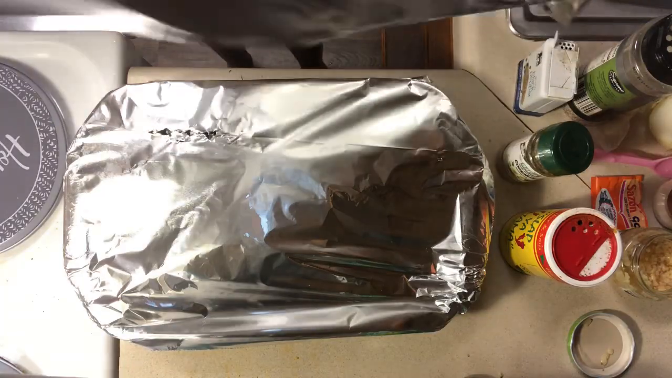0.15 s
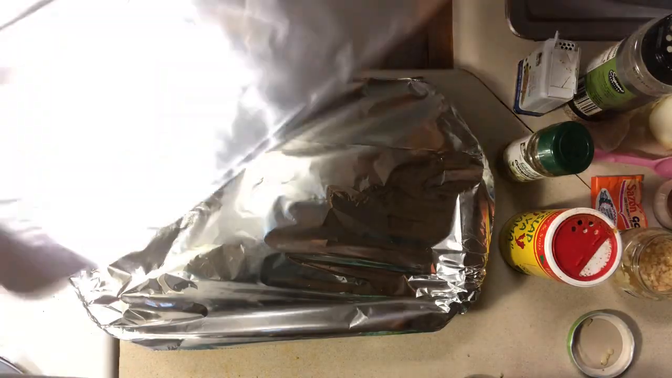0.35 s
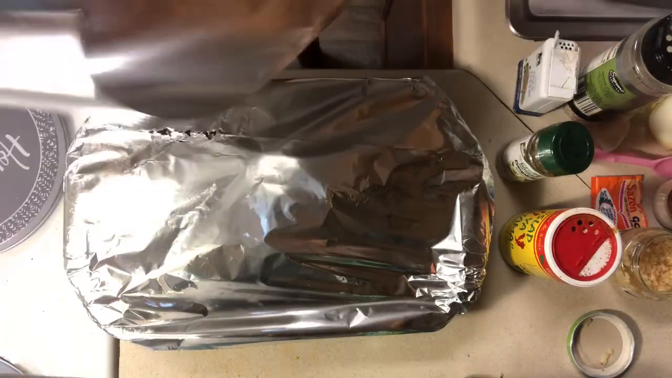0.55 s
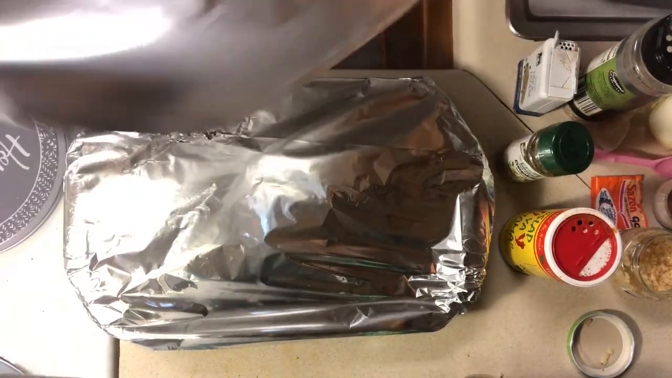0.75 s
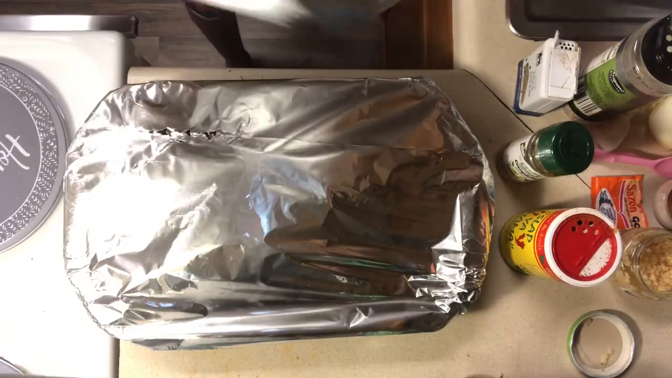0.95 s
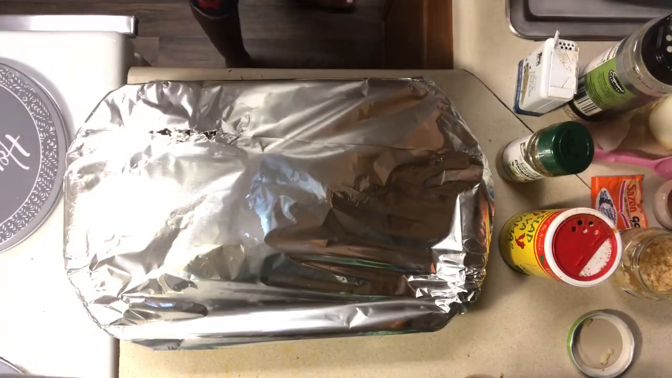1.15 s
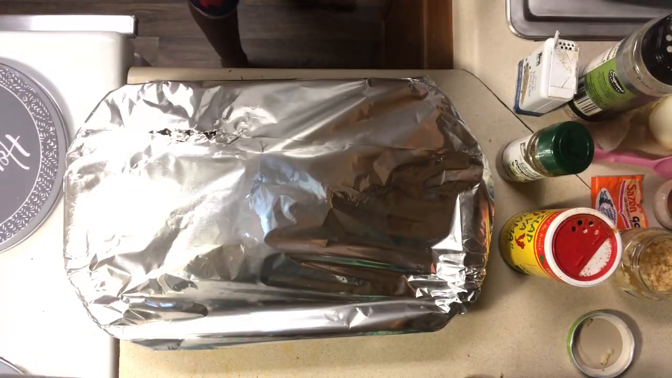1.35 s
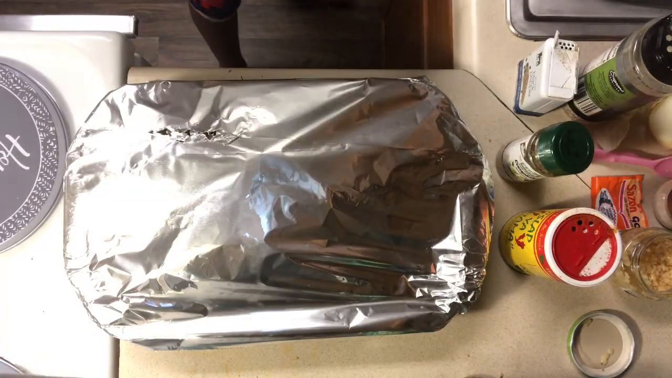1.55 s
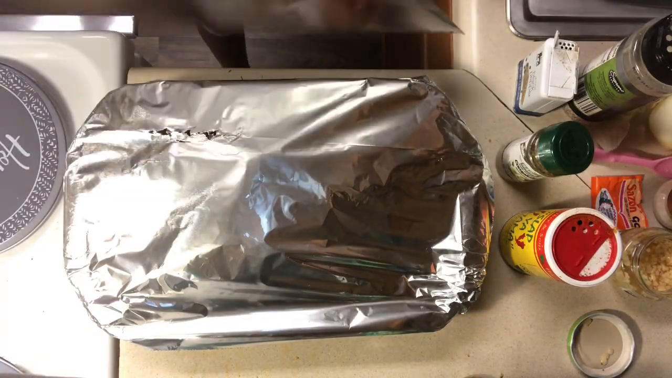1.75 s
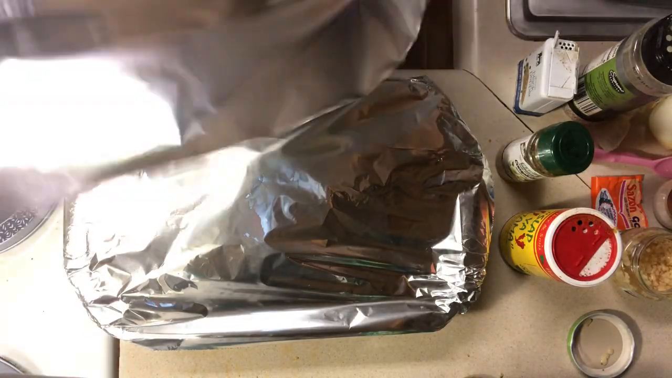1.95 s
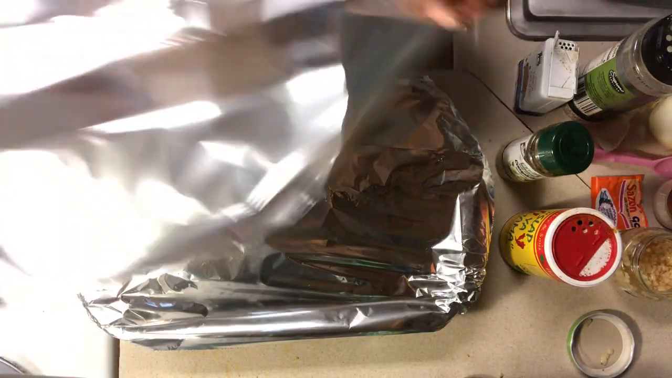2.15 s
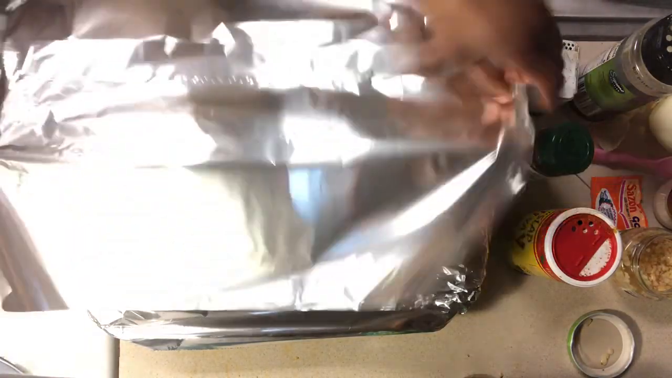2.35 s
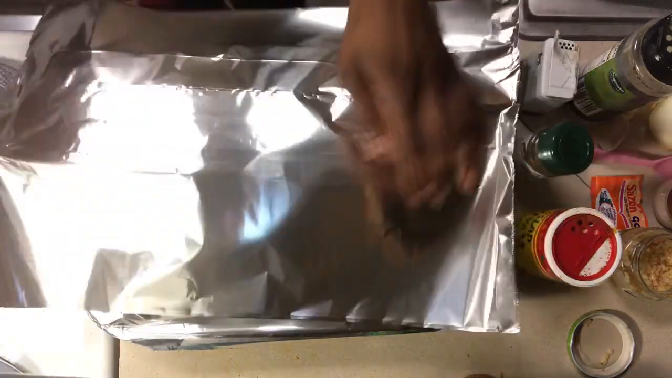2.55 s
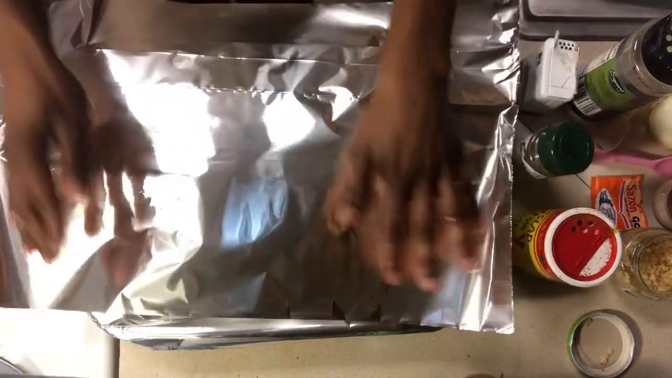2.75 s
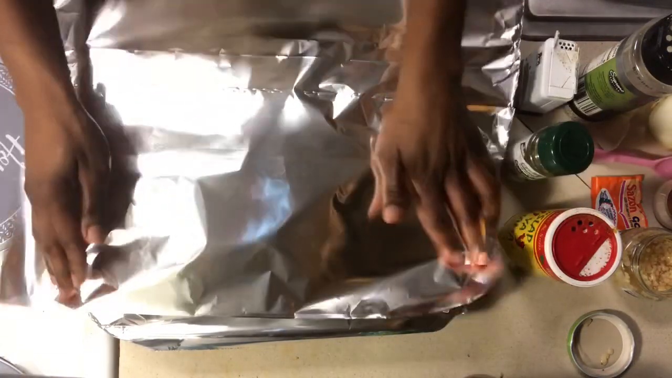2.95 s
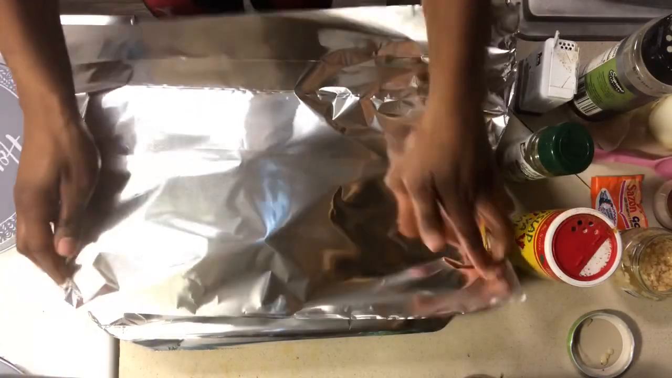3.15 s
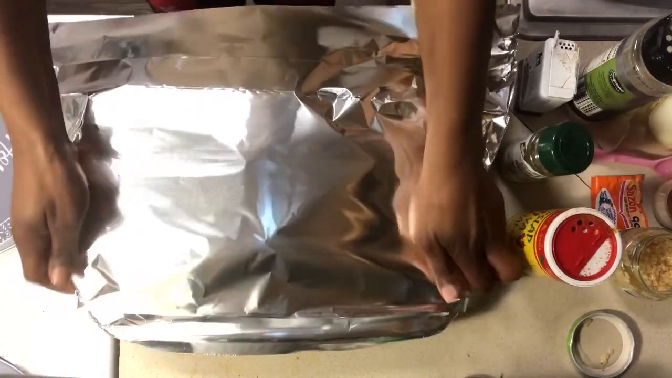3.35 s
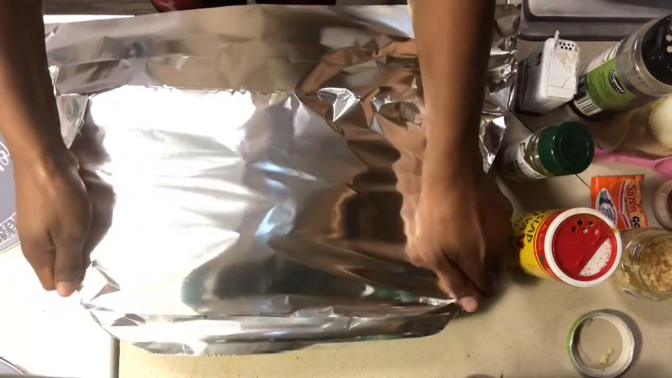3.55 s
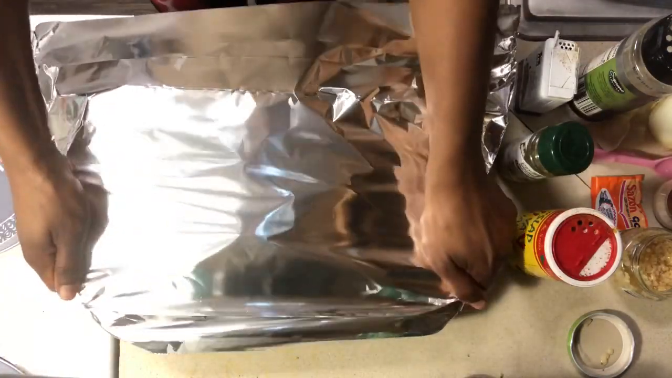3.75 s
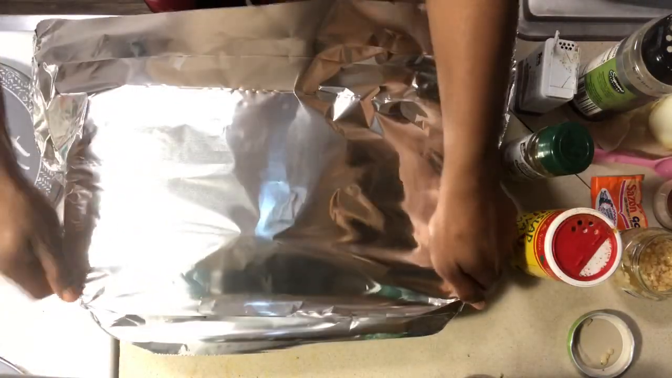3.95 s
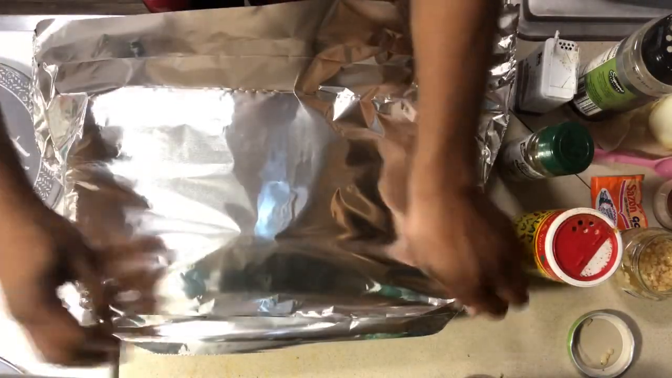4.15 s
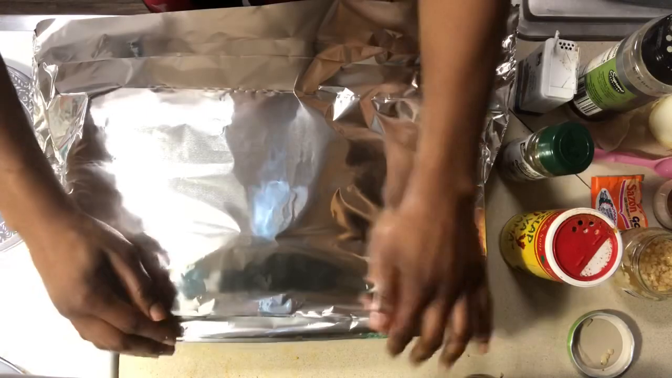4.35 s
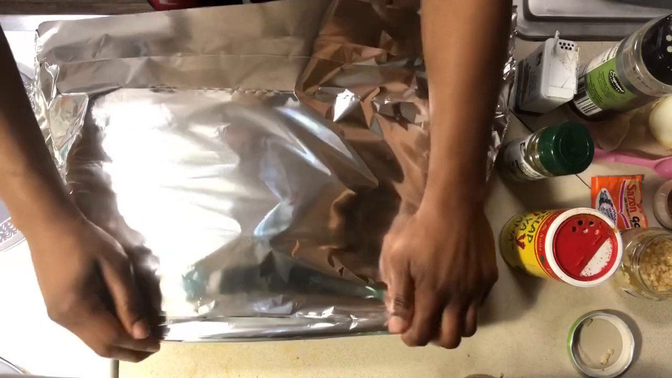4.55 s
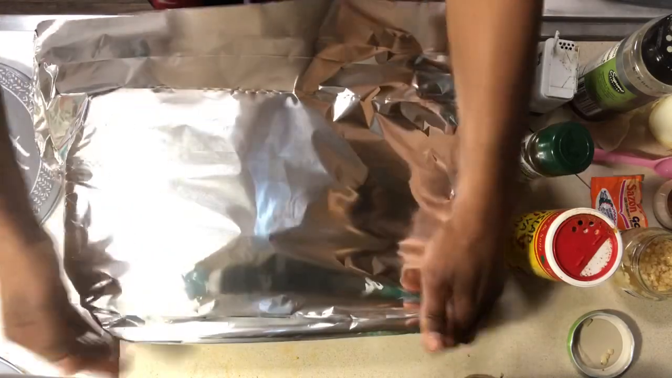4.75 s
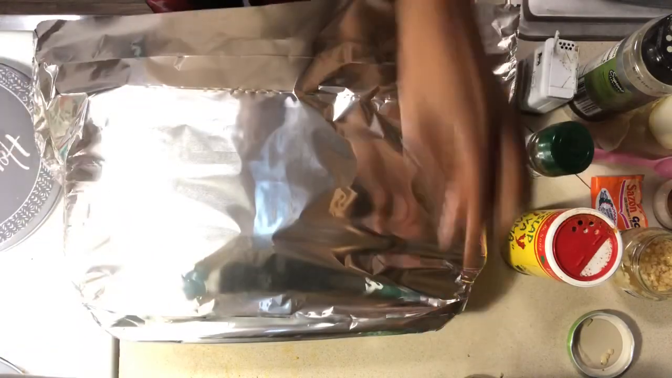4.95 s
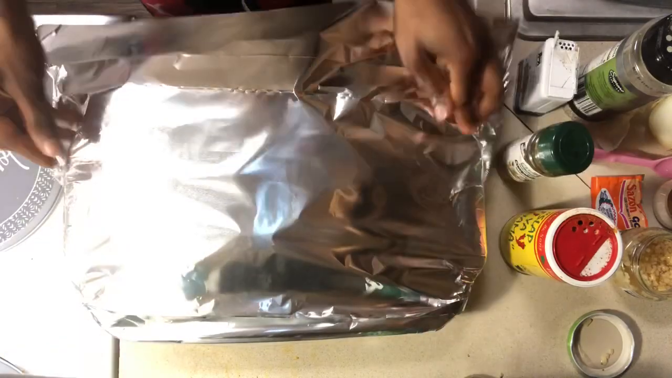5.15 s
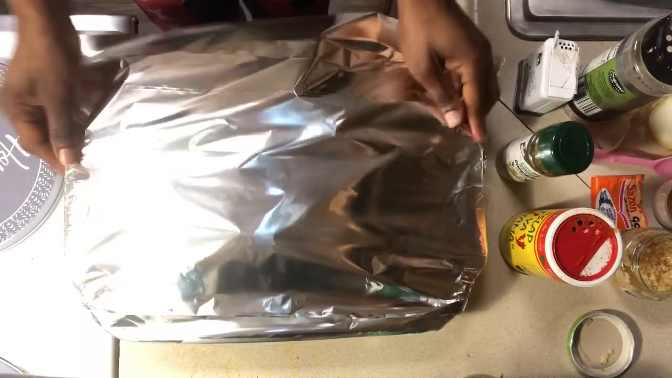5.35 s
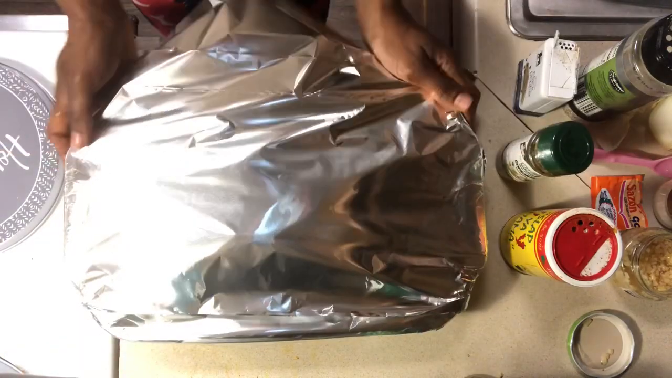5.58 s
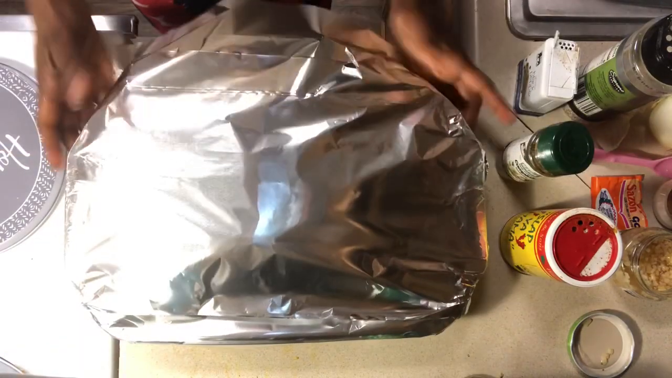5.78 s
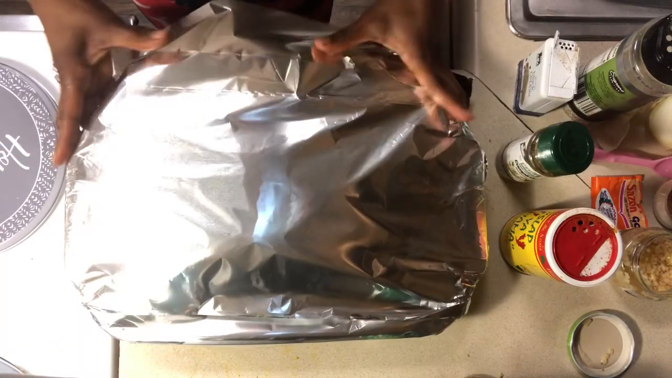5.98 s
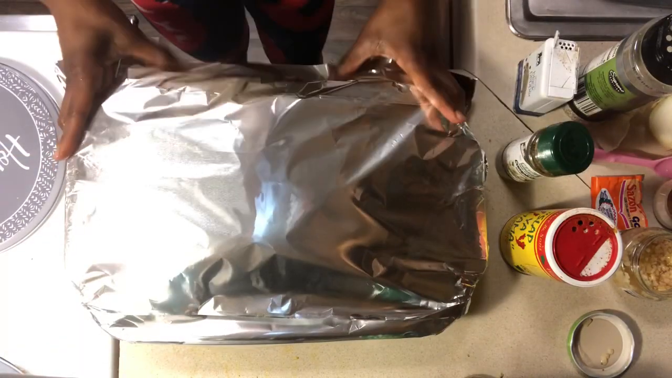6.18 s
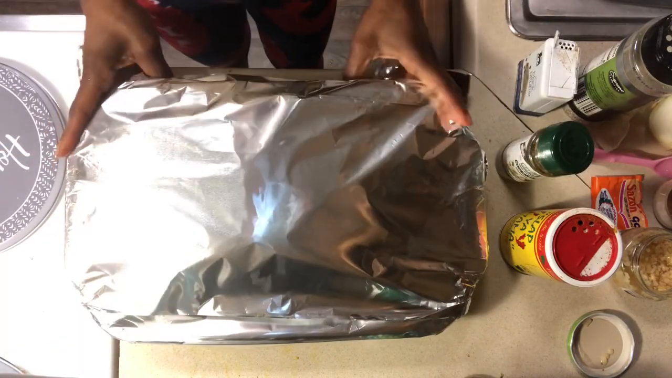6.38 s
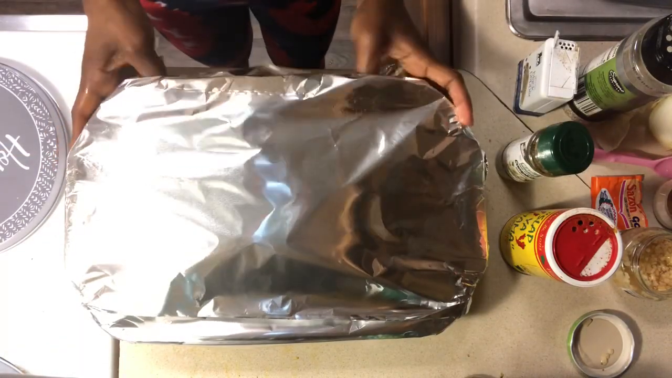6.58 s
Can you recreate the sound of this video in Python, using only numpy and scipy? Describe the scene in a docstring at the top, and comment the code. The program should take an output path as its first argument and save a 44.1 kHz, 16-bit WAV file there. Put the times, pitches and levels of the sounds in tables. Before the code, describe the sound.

Foil is pulled off a roll that rattles in its cardboard box, ripped along a serrated cutter, then crackles as hands crimp it over a dish.

```python
"""Crackling, sizzling foil is pulled off a roll that knocks in its cardboard box, torn along the cutter,
laid on a baking dish and crimped round the rim; dull low thuds sound below and a small kitchen hums.
Every buckling crease is a tiny snap that sets a patch of the sheet ringing, as random impulses through
decaying noise bands. Knocks and thuds are noise bursts through resonances; the kitchen is filtered noise."""
import sys
import numpy as np
from scipy import signal
from scipy.fft import rfft, irfft, next_fast_len
from scipy.io import wavfile
from scipy.ndimage import uniform_filter1d

SR = 44100
rng = np.random.default_rng(int(sys.argv[2]) if len(sys.argv) > 2 else 0)


def generate_wav(sig):
    """Save sig (samples, or channels by samples) to the path in sys.argv[1] as 16-bit PCM at SR."""
    pcm = np.round(np.clip(np.atleast_2d(sig).T, -1, 1) * 32767).astype(np.int16)
    wavfile.write(sys.argv[1], SR, pcm)


N = 291927
TIME = np.arange(N) / SR


def from_db(db):
    """Logarithmic level: decibels to amplitude gain."""
    return 10 ** (np.asarray(db) / 20)


def rms_one(x):
    """Normalisation: scale to an effective value of 1."""
    return x / np.sqrt(np.mean(x ** 2) + 1e-20)


def unit_energy(x):
    """Normalisation: scale to a total energy of 1."""
    return x / np.linalg.norm(x)


def in_time(rows):
    """Linear interpolation: the columns of a curve at every sample."""
    s, *columns = np.transpose(rows)
    return [np.interp(TIME, s, column) for column in columns]


def at_hz(points, hz):
    """Logarithmic pitch scale: read a table along a log-frequency axis."""
    f, value = np.transpose(points)
    return np.interp(np.log(hz + 1e-3), np.log(f), value)


def shaped(x, gain):
    """Linear filtering: multiply the spectrum by a smooth gain, given as a function of frequency."""
    size = next_fast_len(len(x) + 2048)
    spectrum = rfft(x, size) * gain(np.fft.rfftfreq(size, 1 / SR))
    return irfft(spectrum, size)[:len(x)]


def cut(x, hz, kind, order=2):
    """Maximally flat (Butterworth) low- or high-pass."""
    return signal.sosfilt(signal.butter(order, hz, kind, fs=SR, output="sos"), x)


def resonate(x, hz, width_hz):
    """Simple resonance: a pole pair whose damping sets the bandwidth, with gain 1 on top."""
    r = np.exp(-np.pi * width_hz / SR)
    zeros = np.array([1, 0, -1]) * (1 - r * r) / 2
    return signal.lfilter(zeros, [1, -2 * r * np.cos(2 * np.pi * hz / SR), r * r], x)


def add(out, s, sound):
    """Superposition: mix a sound in at a time."""
    start = max(round(s * SR), 0)
    out[start:start + len(sound)] += sound[:max(N - start, 0)]


def dense_ring(t60s, patchy_db, size):
    """High modal density: overlapping modes as noise bands, each with its own decay and level; energy 1."""
    t, hz = np.arange(size) / SR, np.fft.rfftfreq(size, 1 / SR)
    edges = np.geomspace(80, 20000, 33)[:, None]
    low, high = edges[:-1], edges[1:]
    random_phase = np.exp(2j * np.pi * rng.random(len(hz)))
    bands = irfft(random_phase * ((hz >= low) & (hz < high)), size)
    decay_db = -60 * t / at_hz(t60s, np.sqrt(low * high))
    uneven = rms_one(uniform_filter1d(rng.standard_normal(len(bands)), size=3))[:, None]
    return rms_one(np.sum(bands * from_db(decay_db + patchy_db * uneven), axis=0)) / np.sqrt(size)


# Colour of the background air noise. Each row: frequency in Hz, gain in dB.
AIR_COLOUR = [(30, -21), (60, -4.5), (110, -5), (170, 0), (260, -4), (560, -4.5), (680, -11.5), (850, -14),
              (2300, -13.5), (3800, -25), (5500, -32), (9000, -37), (15000, -49.5)]
# Appliance hum and fan resonances, each two equal resonators in series.
# Each row: frequency in Hz, width of one resonator in Hz, rms level in dB.
HUM_BANDS = [(122.5, 3.5, -65), (165.5, 8.6, -58), (245.8, 7.1, -67.5), (341, 22, -66.5),
             (480.5, 79, -61.5), (598, 74, -65)]


def background(air_db=-52.0, lowest_hz=42):
    """Filtered noise: a steady rush of air, and narrow noise bands for the hum of an appliance."""
    air = shaped(rng.standard_normal(N), lambda hz: from_db(at_hz(AIR_COLOUR, hz)))
    out = from_db(air_db) * rms_one(cut(air, lowest_hz, "high"))
    for hz, width_hz, db in HUM_BANDS:
        noise = rng.standard_normal(N + SR)   # the first second lets the resonators settle
        band = resonate(resonate(noise, hz, width_hz), hz, width_hz)[SR:]
        out += from_db(db) * rms_one(band)
    return out


# Reverberation of the kitchen. Each row: frequency in Hz, time to decay by 60 dB in seconds.
ROOM_DECAY = [(100, 0.21), (400, 0.8), (1000, 0.17), (3500, 0.6), (8000, 0.39), (16000, 0.32)]


def kitchen(x, wet_db=-17.0, delay_s=.007):
    """Reverberation: the direct sound, then the short diffuse tail of a hard-walled room."""
    out = x.copy()
    tail = signal.oaconvolve(x, dense_ring(ROOM_DECAY, patchy_db=0, size=20000))[:N]
    add(out, delay_s, from_db(wet_db) * tail)
    return out


# Dull low thuds: one as the roll knocks in its box, the rest as the dish rocks on the counter.
# Each row: start in seconds, relative peak level in dB.
LOW_THUDS = [(1.073, -43), (3.131, -51), (4.769, -50), (5.482, -51), (5.581, -47), (5.957, -53),
             (6.058, -43)]


def low_thuds(level_db=3.5, decay_s=0.027):
    """Forced vibration: a decaying push excites a low resonance, heard as a dull thud."""
    out, t = np.zeros(N), TIME[:SR // 4]
    for s, peak_db in LOW_THUDS:
        push = rng.standard_normal(len(t)) * np.exp(-t / decay_s)
        thud = resonate(push, 85, 34) + resonate(push, 85, 35)
        thud = cut(cut(thud, 240, "low"), 45, "high")
        add(out, s, from_db(peak_db + level_db) * thud / np.abs(thud).max())
    return out


# The spell in which the roll rattles: start in seconds, end in seconds.
RATTLE_SPAN = (0.265, 0.495)


def rattle(per_s=52, clack_db=-14.5, boom_db=-31.5, scatter_db=1.5):
    """Jittered repetition: uneven knocks while the roll spins, as rows like those of ROLL_KNOCKS."""
    times = np.arange(*RATTLE_SPAN, 1 / per_s)
    chance = rng.standard_normal((len(times), 3))
    return [(s + shift * 0.18 / per_s, clack_db + scatter_db * clack, boom_db + scatter_db * boom)
            for s, (shift, clack, boom) in zip(times, chance)]


# Single knocks of the roll in its box, strong and faint.
# Each row: start in seconds, relative peak level of the clack in dB, relative rms level of the boom in dB.
ROLL_KNOCKS = [(0.3226, -2.5, -34), (0.3415, -6.5, -40), (0.351, -12, -35), (0.37, -12, -36),
               (0.456, -21, -27.5), (0.474, -15, -35), (0.8891, -26.5, -38.5), (1.029, -19, -29),
               (1.038, -28, -40), (1.06, -23, -44), (1.2318, -33.5, -38)]
# Modes of the cardboard box. Each row: frequency in Hz, width in Hz, gain in dB.
BOX_MODES = [(285, 104, -7), (392, 77, -2), (484, 46, -1), (632, 97, -6.5), (1106, 41, -4),
             (1226, 58, -3.5), (1513, 120, 1), (1596, 51, 2), (1723, 74, 3), (1972, 180, -1),
             (2156, 450, -3.5), (2750, 290, -6), (3400, 900, -13)]


def box_modes(push, low_hz, high_hz):
    """Modal summation: the box modes between two frequencies, with alternating sign."""
    return sum((-1) ** k * from_db(db) * resonate(push, hz, width_hz)
               for k, (hz, width_hz, db) in enumerate(BOX_MODES) if low_hz < hz < high_hz)


def roll_in_box(clack_db=-4.0, boom_db=-4.0, scuff_s=0.017, swell_s=0.0085, boom_s=0.022, top_hz=4800):
    """Impact excitation: a short scuff makes the walls clack at once; the hollow boom swells just after."""
    out, t = np.zeros(N), TIME[:SR // 5]
    for s, peak_db, hollow_db in ROLL_KNOCKS + rattle():
        grit = rng.standard_normal(len(t))
        scuff = grit * np.exp(-t / scuff_s)
        scuff[0] = 6   # a strong first contact
        swell = grit * t * np.exp(-t / swell_s)
        walls = cut(box_modes(scuff, 800, np.inf), top_hz, "low")
        hollow = box_modes(swell, 0, 800)
        add(out, s, from_db(peak_db + clack_db) * walls / np.abs(walls).max())
        # the boom's rms level counts its energy as if spread over boom_s
        add(out, s, from_db(hollow_db + boom_db) * np.sqrt(boom_s * SR) * unit_energy(hollow))
    return out


# Colour of the ringing foil before its low roll-off. Each row: frequency in Hz, gain in dB.
FOIL_COLOUR = [(500, -8), (1000, -16), (1400, -6.5), (1850, -7), (2400, -2), (3100, -1), (4000, -2.5),
               (4800, -5), (6300, -3.5), (7700, -1.5), (8500, -4.5), (11500, -6.5), (14000, -12),
               (16000, -17.5)]


def foil_colour(hz):
    """Radiation efficiency: the thin sheet radiates little below a kilohertz or so."""
    return from_db(at_hz(FOIL_COLOUR, hz)) / np.sqrt(1 + (1450 / (hz + 1)) ** (2 * np.pi))


# Ringing of the foil. Each row: frequency in Hz, time to decay by 60 dB in seconds.
FOIL_DECAY = [(300, 0.1), (1500, 0.15), (4000, 0.17), (9000, 0.14), (16000, 0.084)]
# Pitch range of the foil's facets: lowest in Hz, highest in Hz.
FACET_RANGE = (1870, 11330)


def buckle(crack_db, crack_s, patchy_db, ping_db=-10.5, ping_spread_db=6.5):
    """Snap-through buckling: a crease cracks, a facet beside it pings, the sheet around shimmers; energy 1."""
    ring = dense_ring(FOIL_DECAY, patchy_db, size=4096)
    t = TIME[:len(ring)]
    crack = rng.standard_normal(len(t)) * np.exp(-t / crack_s)
    facet_hz = np.exp(rng.uniform(*np.log(FACET_RANGE)))   # small facets ping high
    cycles = rng.uniform(2, 8)   # cycles in which the ping falls to 1/e
    ping = np.sin(2 * np.pi * facet_hz * t) * np.exp(-t * facet_hz / cycles)
    ping_gain = from_db(ping_db + ping_spread_db * rng.uniform(-0.96, 1))
    return unit_energy(ring + from_db(crack_db) * unit_energy(crack) + ping_gain * unit_energy(ping))


# Loudness of the tear: start, full level, start of fading and end, each in seconds.
TEAR_TIMES = [1.776, 1.78, 2.2, 2.33]
# Ripping along the cutter. Each row: time in seconds, relative crackle level in dB.
RIP_CURVE = [(1.79, -29.5), (1.942, -26.5), (1.994, -30.5), (2.19, -29.5), (2.252, -34), (2.26, -31),
             (2.38, -37)]


def tearing(level_db=-3.0, teeth_hz=520, slip=.3, lead_s=.012, rasp_hz=5200, rasp_width_hz=5000):
    """Impulse train: the sheet parts tooth by tooth along the serrated cutter, at an unsteady speed."""
    # the ring lags the teeth, so the level is read a little early
    rip_db = np.interp(TIME + lead_s, TIME, in_time(RIP_CURVE)[0])
    drift = rms_one(uniform_filter1d(rng.standard_normal(N), SR // 50))
    teeth_passed = np.floor(np.cumsum(teeth_hz * np.exp(slip * drift)) / SR)
    teeth = np.diff(teeth_passed, prepend=0) * from_db(4 * rng.standard_normal(N))
    snap = buckle(crack_db=-4.0, crack_s=0.00062, patchy_db=3, ping_db=-29.0)
    rip = signal.oaconvolve(teeth * rng.choice([-1, 1], N), snap)[:N]
    rip = rms_one(resonate(shaped(rip, foil_colour), rasp_hz, rasp_width_hz))
    return rip * from_db(rip_db + level_db) * np.interp(TIME, TEAR_TIMES, [0, 1, 1, 0])


# Single snaps of the foil, and the sharp crack of one box knock.
# Each row: start in seconds, relative level in dB, treble gain in dB.
SINGLE_SNAPS = [(0.0548, -18, 2), (0.105, -14, 5), (0.208, -15, -3), (0.4244, -22, -10), (0.4808, -15, 10),
                (0.641, -21, 11), (0.9782, -25, -1), (1.027, -24, -7), (1.0723, -30.5, 10),
                (1.1468, -25.5, 3), (1.3282, -34.5, 1), (1.3896, -34.5, 2), (1.52, -34.5, 12),
                (1.7803, -22.5, 16.5), (1.9242, -16, 13), (2.2602, -20.5, 11), (2.7705, -23.5, 0.5),
                (2.829, -22, 12.5), (2.924, -13.5, 4.5), (2.9977, -22, 12), (3.1904, -14.5, -9),
                (3.3818, -17, -13), (3.774, -22, 6.5), (3.941, -26, -4), (3.9925, -28.5, -24),
                (4.139, -35, -12), (4.168, -27, 0), (4.2701, -28.5, -9), (4.3438, -29, 3),
                (4.5036, -32, -6), (4.568, -17, 0), (4.5917, -17.5, -2), (4.6387, -19.5, 5.5),
                (4.8792, -35.5, -17), (5.0557, -18.5, 7.5), (5.087, -20.5, 9.5), (5.1421, -14.5, -3),
                (5.325, -15, 0), (5.3622, -13.5, -1), (5.568, -17, -16), (6.061, -11.5, -10),
                (6.246, -17, -8), (6.354, -26, 9), (6.501, -16.5, 3), (6.572, -16, 7)]


def snaps(level_db=19.0, bright_hz=7000):
    """Impulse response: single snaps ring one at a time; some sound bright, others dull."""
    out = np.zeros(N)
    for s, snap_db, bright_db in SINGLE_SNAPS:
        snap = buckle(crack_db=0.0, crack_s=0.023, patchy_db=3, ping_db=-16.5)
        dull = cut(snap, bright_hz, "low", order=1)
        add(out, s, from_db(snap_db + level_db) * (dull + from_db(bright_db) * (snap - dull)))
    return shaped(out, foil_colour)


def dip_and_burst(dip_db=4, dip_s=0.0082, burst_db=3.0, burst_s=0.0036):
    """Gain modulation: the crackle dips just before each snap or knock and bursts briefly at it."""
    db, t = np.zeros(N), TIME[:SR // 10]
    dip = -dip_db * np.exp(-t / dip_s)[::-1]
    for s, *_ in [*SINGLE_SNAPS, *ROLL_KNOCKS]:
        cropped = max(len(dip) - round(s * SR), 0)   # the part that would fall before time zero
        add(db, s - len(dip) / SR, dip[cropped:])
        add(db, s, burst_db * np.exp(-t / burst_s))
    return from_db(db)


def working_spot(count, moves_per_s=22, size=7):
    """Localised strain: buckling stays among a few neighbouring patches, then jumps elsewhere."""
    moves = np.cumsum(rng.random(N) < moves_per_s / SR)
    return (rng.integers(0, count, N)[moves] + rng.integers(0, size, N)) % count


ATTACK_S, RELEASE_DB_PER_S = 0.024, 374
# the creases go on settling after each movement, softly and for longer
SETTLE_DB, SETTLE_DB_PER_S = -6.5, 134


def movement(start, end, db, attack_s):
    """Relaxation: power of the crackle in one movement, with attack, hold, quick release and slow settling."""
    attack = np.clip((TIME - start) / attack_s, 0, 1)
    after = np.maximum(TIME - end, 0)
    fall_db = np.maximum(-RELEASE_DB_PER_S * after, SETTLE_DB - SETTLE_DB_PER_S * after)
    return (attack * from_db(db + fall_db)) ** 2


def stroke(s, length, db, swell_db):
    """Linear level ramp: a movement that swells or fades evenly about its level while it lasts."""
    progress = np.clip((TIME - s) / length, 0, 1)
    return movement(s, s + length, db + swell_db * (progress - .5), ATTACK_S)


# Drawing the sheet off the roll in one pull. Each row: time in seconds, relative crackle level in dB.
PULL_CURVE = [(0.0, -31.5), (0.126, -31), (0.148, -34.5), (0.308, -16.5), (0.462, -19), (0.482, -18.5),
              (0.54, -33), (0.66, -32.5), (0.794, -36.5), (0.97, -48)]
# The loose sheet sways in the air. Each row: start in seconds, length in seconds,
# relative crackle level in dB, swell from start to end in dB.
SHEET_SWAYS = [(0.968, 0.043, -43, 2), (1.06, 0.13, -41, 5), (1.317, 0.19, -43.5, 2),
               (1.487, 0.086, -43, 3), (1.581, 0.085, -38, 4), (1.67, 0.13, -41, 0)]
# The hands press it onto the dish and round the rim. Each row: start in seconds, length in seconds,
# relative crackle level in dB, swell from start to end in dB, panel flexing against the crackle in dB.
HAND_PRESSES = [(2.368, 0.16, -31, 4.5, -18), (2.756, 0.083, -32.5, 4, -13),
                (2.824, .23, -30.5, -1.5, -11.5), (3.069, 0.14, -29.5, 0, -12.5),
                (3.24, 0.37, -33.5, 7.5, -9.5), (3.715, .11, -34.5, 6, -9), (3.84, 0.14, -44, -9, -9),
                (4.007, 0.022, -38, 3, -17), (4.269, .15, -37, 12.5, -10), (4.433, 0.062, -36, 9.5, -8),
                (4.54, 0.19, -38.5, 2, -9), (4.844, 0.17, -58.5, 1, -5), (5.037, 0.14, -34.5, 0, -9),
                (5.104, .055, -26, -1.5, -12), (5.201, 0.19, -31, 1.5, -8.5), (5.416, 0.16, -31.5, 3, -9.5),
                (5.621, .05, -34, 2, -14), (5.69, 0.18, -36, -8.5, -12), (5.88, 0.071, -31.5, 8, -16),
                (6.004, 0.075, -31, 9, -9.5), (6.082, 0.37, -35, -2.5, -11.5),
                (6.461, 0.16, -32, 1.5, -9.5)]
# flexing of broad panels against the crackle (dB)
FLEX_PULL_DB, FLEX_RIP_DB, FLEX_SWAY_DB = -23.5, -24.5, -29
# the finest creases need force: below this crackle level their sizzle drops out, by so many dB per dB
SIZZLE_KNEE_DB, SIZZLE_DROP = -28, 1


def handling(pull_db=0.5, rip_db=-1.0, lead_s=0.012, rip_attack_s=0.0096):
    """Power addition: levels in dB of crackle, panel flexing and fine sizzle, all following the force."""
    # the ring lags the buckles, so both curves run early
    pull_curve_db, = in_time(np.array(PULL_CURVE) - [lead_s, 0])
    rip_curve_db, = in_time(np.array(RIP_CURVE) - [lead_s, 0])
    # the pull is already under way at time zero
    pull = movement(-2 * ATTACK_S, PULL_CURVE[-1][0], pull_curve_db + pull_db, ATTACK_S)
    rip = movement(TEAR_TIMES[0], RIP_CURVE[-1][0], rip_curve_db + rip_db, rip_attack_s)
    moves = [(pull, FLEX_PULL_DB), (rip, FLEX_RIP_DB)]
    moves += [(stroke(*row), FLEX_SWAY_DB) for row in SHEET_SWAYS]
    moves += [(stroke(*row), flex) for *row, flex in HAND_PRESSES]
    crackle_db = 10 * np.log10(sum(power for power, _ in moves) + 1e-14)
    flex_db = 10 * np.log10(sum(power * from_db(flex) ** 2 for power, flex in moves) + 1e-14)
    sizzle_db = crackle_db - SIZZLE_DROP * np.maximum(SIZZLE_KNEE_DB - crackle_db, 0)
    return crackle_db, flex_db, sizzle_db


# Pace of the work, from unrolling and tearing to crimping. Each row: time in seconds, buckles per second.
BUCKLE_PACE = [(0, 800), (.35, 1480), (.8, 810), (1.5, 460), (1.9, 1360), (2.4, 900), (3.0, 450),
               (4.2, 248), (5.3, 460), (6.6, 400)]
# Colour of broad flexing panels. Each row: frequency in Hz, gain in dB.
PANEL_COLOUR = [(120, -6), (270, -12), (420, 1), (620, -0.5), (780, -9), (930, -2), (1030, 4), (1190, -3.5),
                (1500, -4.5), (1900, -7), (2600, -30)]


def crinkling(size_db=2.5, even_s=0.044, split_hz=8500, crackle_trim_db=-2.0, sizzle_trim_db=-1.5,
              flex_trim_db=-1.0, count=80):
    """Crackling noise: random buckles of very unequal size, spread over many patches of the sheet."""
    crackle_db, flex_db, sizzle_db = handling()
    per_s, = in_time(BUCKLE_PACE)
    sizes = from_db(size_db * np.minimum(rng.exponential(1, N), 4.5))
    clicks = (rng.random(N) < per_s / SR) * sizes
    # the hands feed in energy steadily, so differences in local power are partly evened out
    power = uniform_filter1d(rms_one(clicks) ** 2, int(even_s * SR)) + 1e-3
    clicks = rms_one(clicks / power ** .42) * dip_and_burst()

    def fine_share(hz):
        """Crossover: the share of the finest creases rises with frequency."""
        return 1 / (1 + (split_hz / (hz + 1)) ** 6)

    # broad panels sound low, ordinary creases in the middle, the finest ones on top
    registers = [(flex_db + flex_trim_db, lambda hz: from_db(at_hz(PANEL_COLOUR, hz))),
                 (crackle_db + crackle_trim_db, lambda hz: foil_colour(hz) * (1 - fine_share(hz))),
                 (sizzle_db + sizzle_trim_db, lambda hz: foil_colour(hz) * fine_share(hz))]
    gains = from_db([db for db, _ in registers])
    onset = np.zeros(SR // 1000)   # a millisecond of silence leads each patch
    patches = [np.append(onset, buckle(crack_db=-10.0, crack_s=0.00093, patchy_db=1.5))
               for _ in range(count)]
    voices = np.array([[shaped(patch, colour) for _, colour in registers] for patch in patches])
    # each register has a mean energy of 1 over the patches
    voices /= np.sqrt(np.mean(np.sum(voices ** 2, axis=2), axis=0))[:, None]
    struck, sign, out = working_spot(count), rng.choice([-1, 1], N), np.zeros(N)
    for i in np.flatnonzero(clicks):
        add(out, i / SR, sign[i] * clicks[i] * gains[:, i] @ voices[struck[i]])
    return out


def scene():
    """Superposition: foil, box and thuds reverberate in the kitchen, over its background."""
    work = low_thuds() + roll_in_box() + tearing() + snaps() + crinkling()
    return (background() + kitchen(work))[None]


def record(dry):
    """Soft saturation and band limiting: the highest peaks are rounded and the top is cut at 15.9 kHz."""
    top = signal.ellip(12, .1, 80, 15900, fs=SR, output="sos")
    return signal.sosfilt(top, 1.2 * np.tanh(dry / 1.2))


dry = scene()
out = record(dry)
generate_wav(out)
```